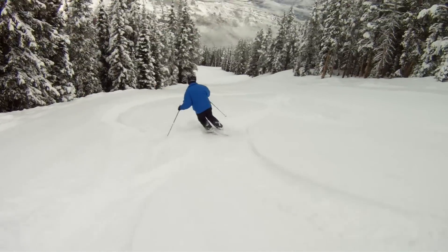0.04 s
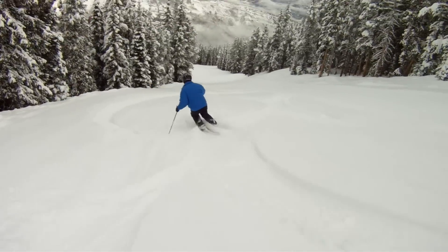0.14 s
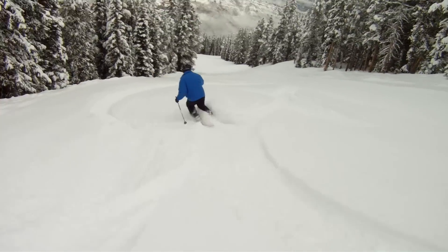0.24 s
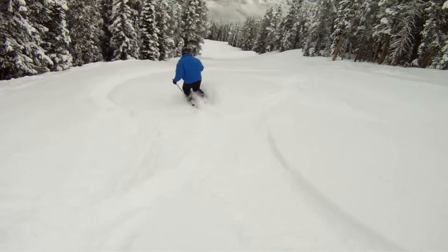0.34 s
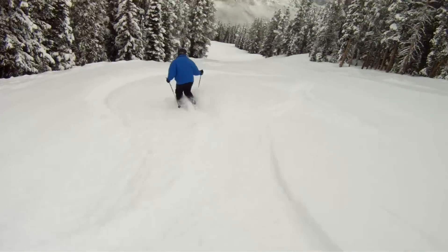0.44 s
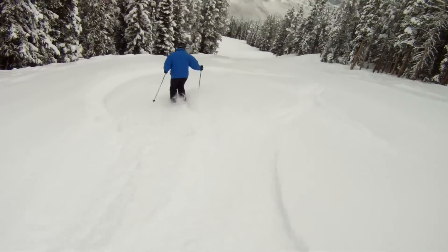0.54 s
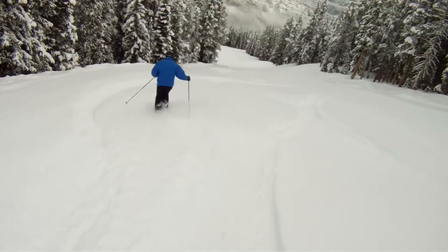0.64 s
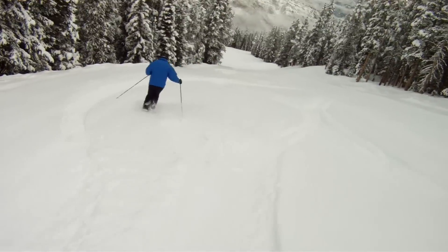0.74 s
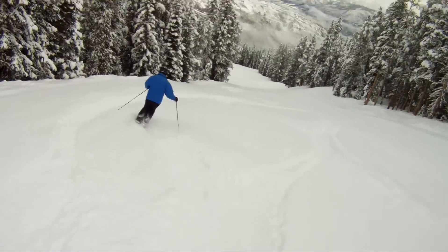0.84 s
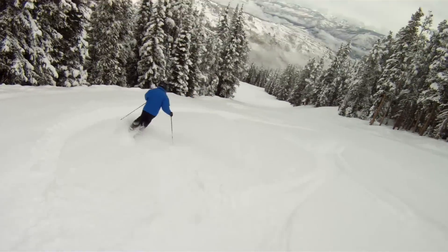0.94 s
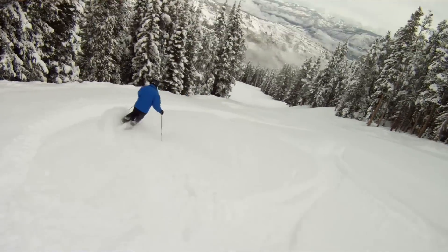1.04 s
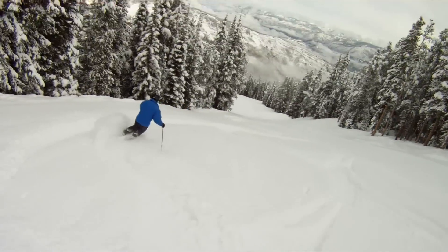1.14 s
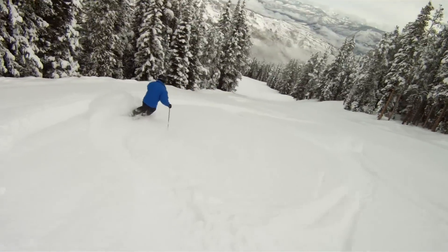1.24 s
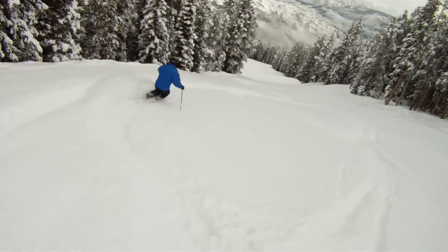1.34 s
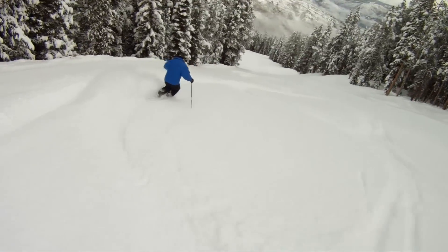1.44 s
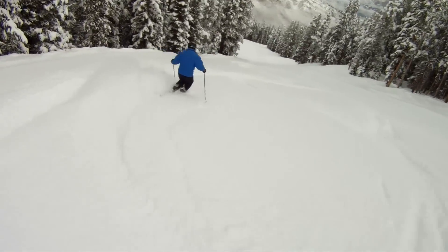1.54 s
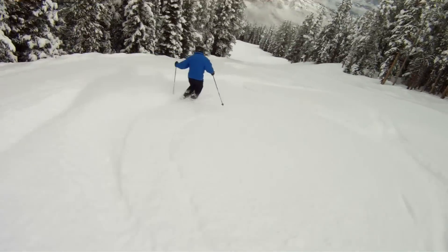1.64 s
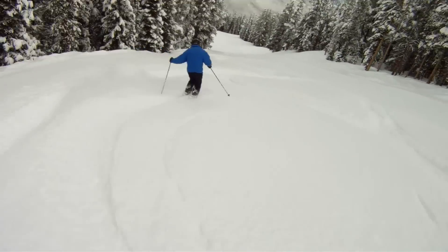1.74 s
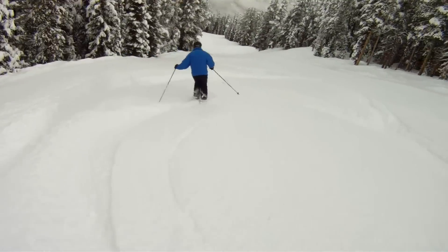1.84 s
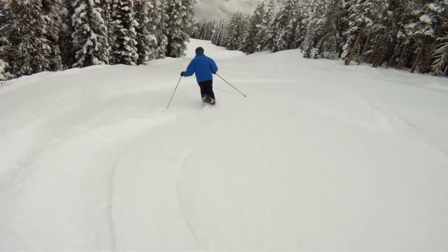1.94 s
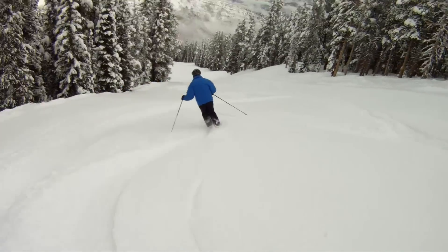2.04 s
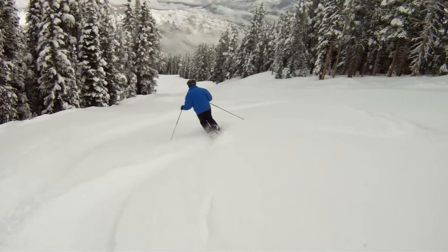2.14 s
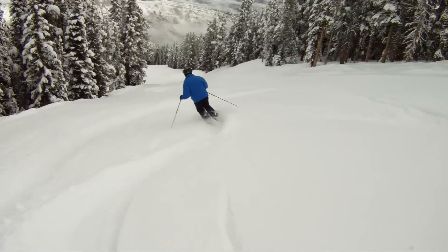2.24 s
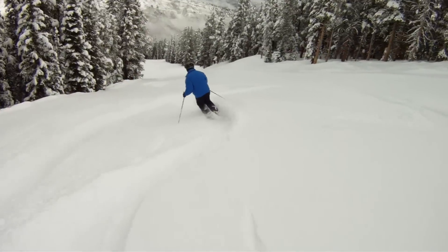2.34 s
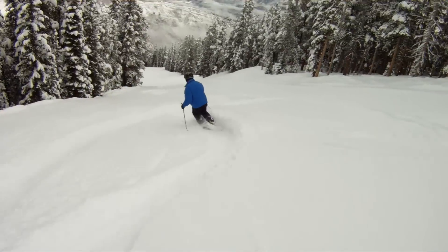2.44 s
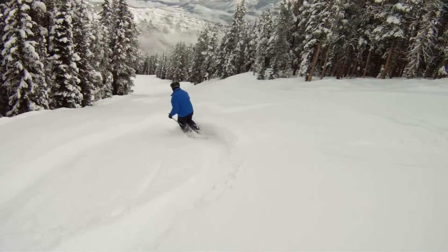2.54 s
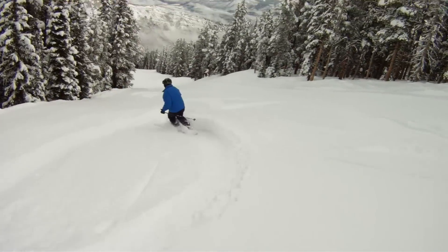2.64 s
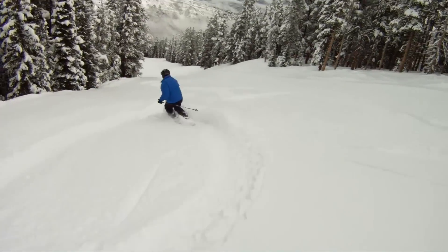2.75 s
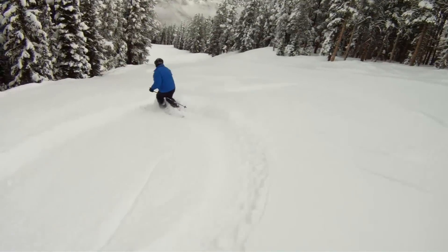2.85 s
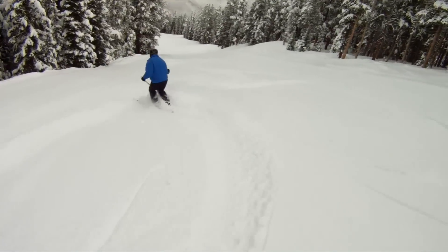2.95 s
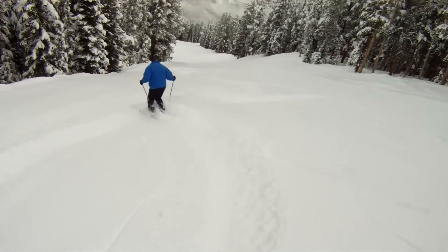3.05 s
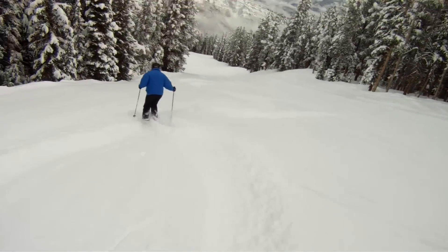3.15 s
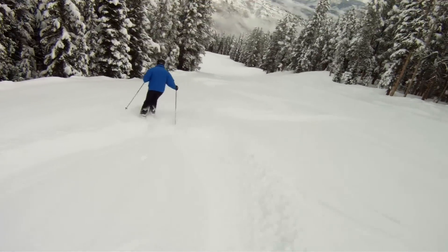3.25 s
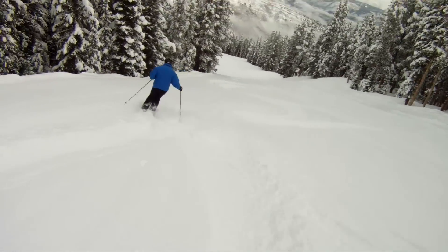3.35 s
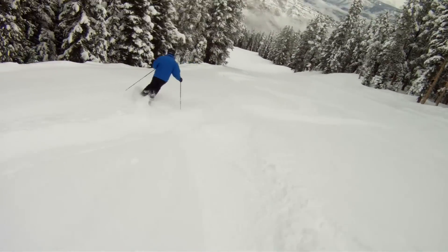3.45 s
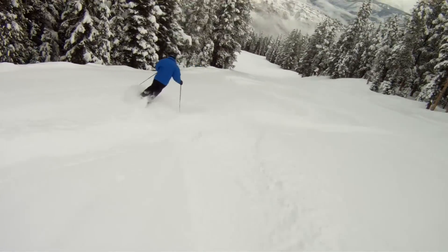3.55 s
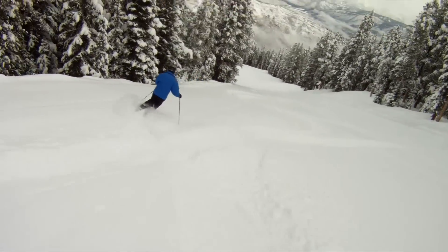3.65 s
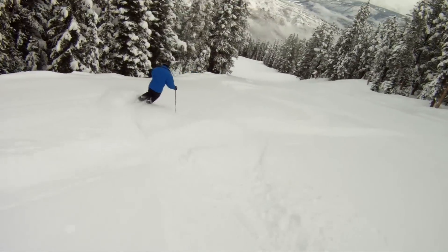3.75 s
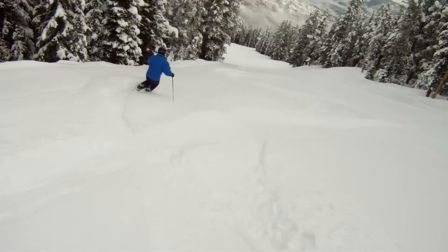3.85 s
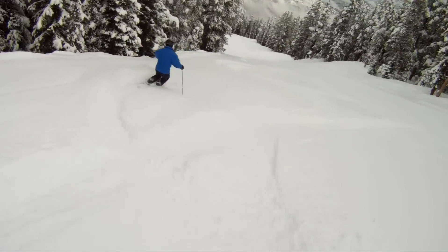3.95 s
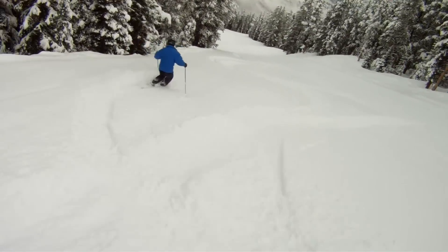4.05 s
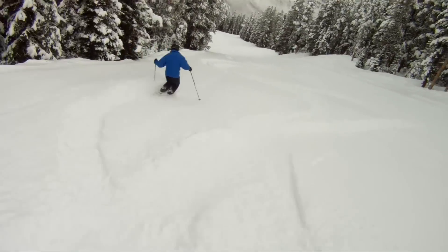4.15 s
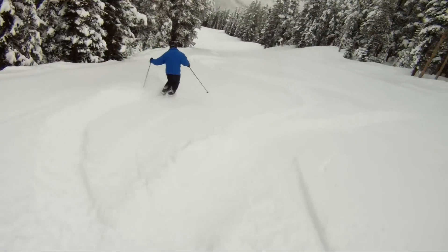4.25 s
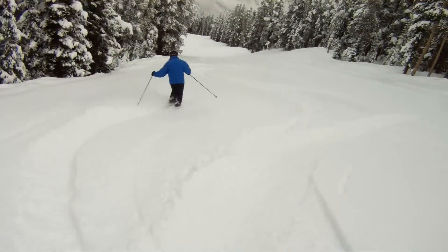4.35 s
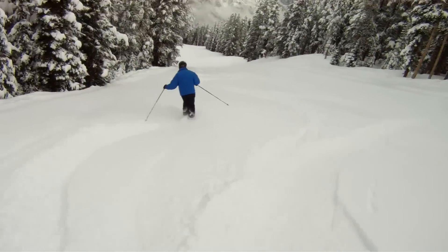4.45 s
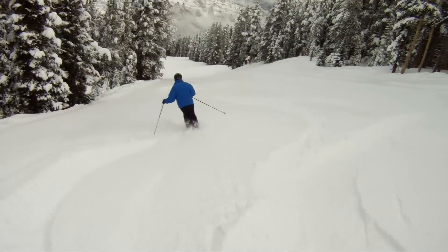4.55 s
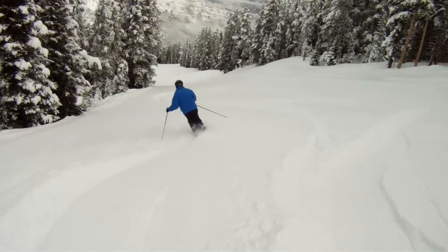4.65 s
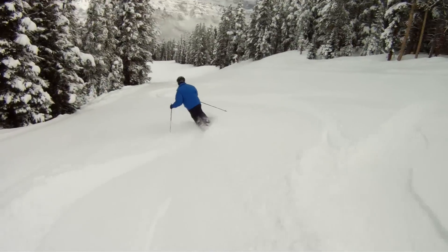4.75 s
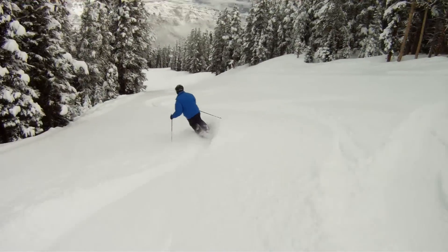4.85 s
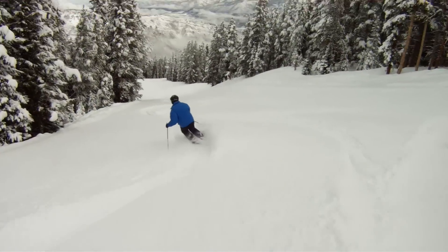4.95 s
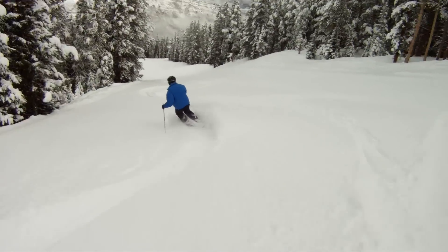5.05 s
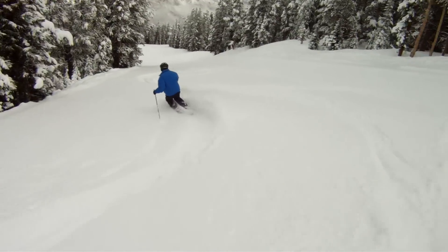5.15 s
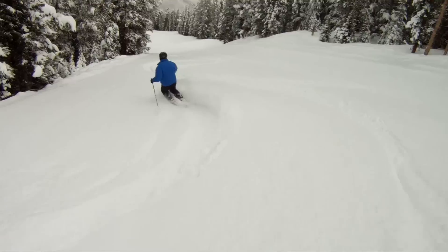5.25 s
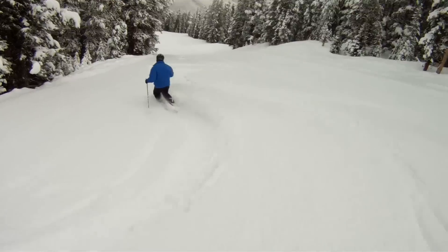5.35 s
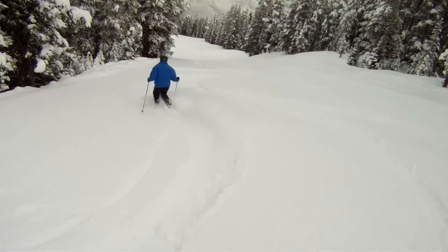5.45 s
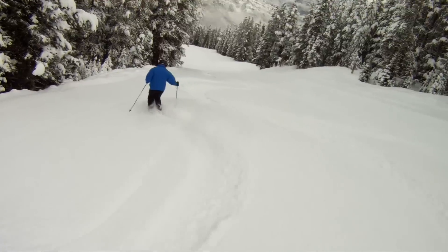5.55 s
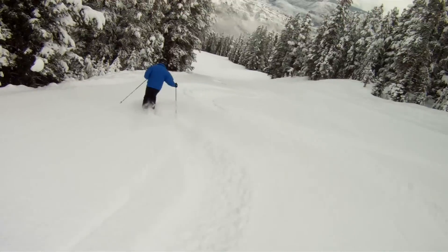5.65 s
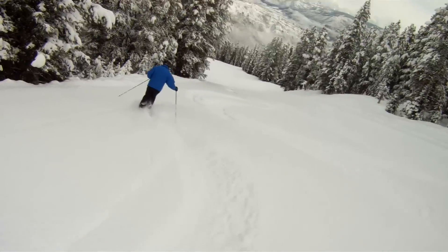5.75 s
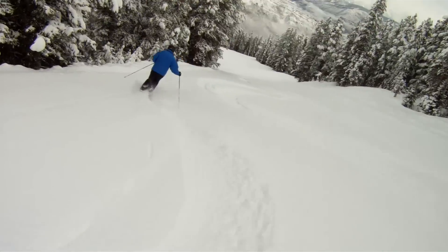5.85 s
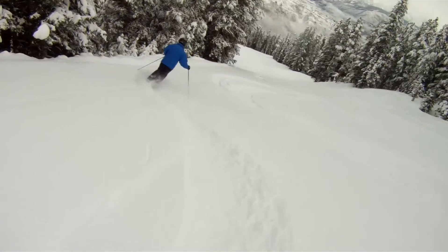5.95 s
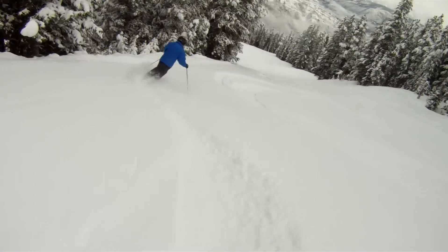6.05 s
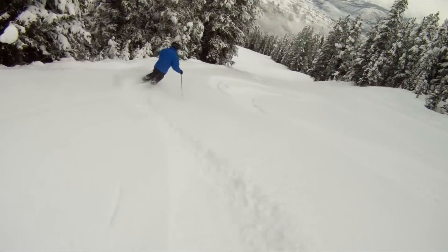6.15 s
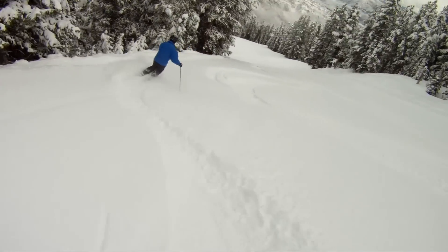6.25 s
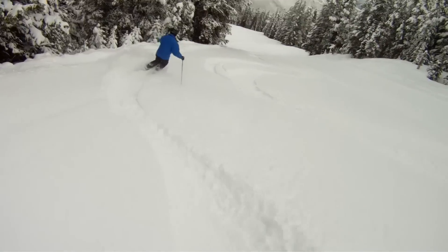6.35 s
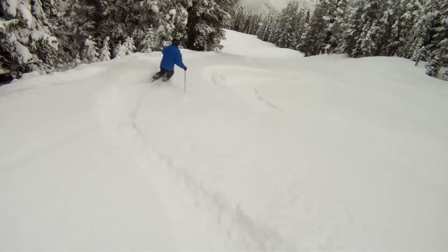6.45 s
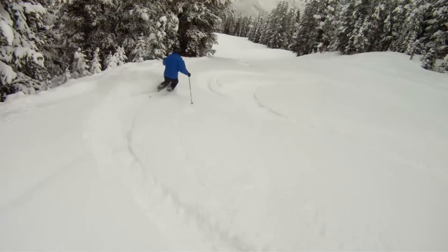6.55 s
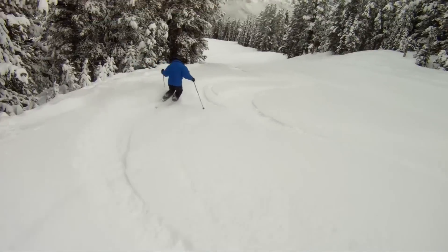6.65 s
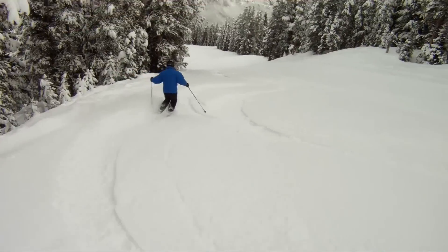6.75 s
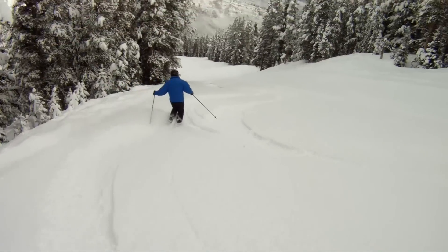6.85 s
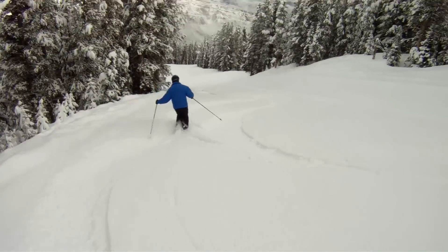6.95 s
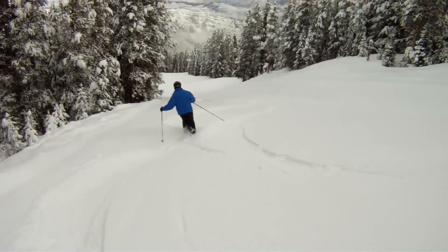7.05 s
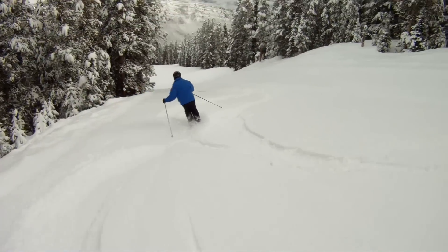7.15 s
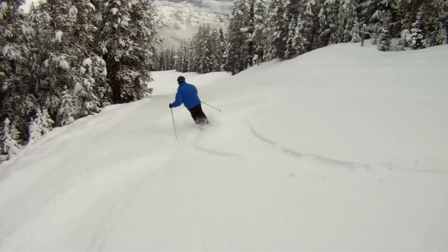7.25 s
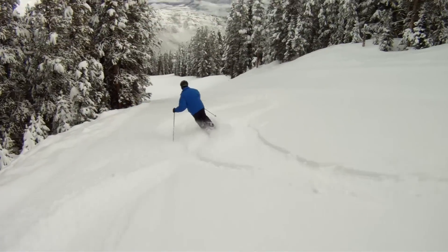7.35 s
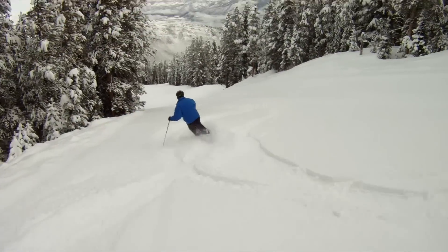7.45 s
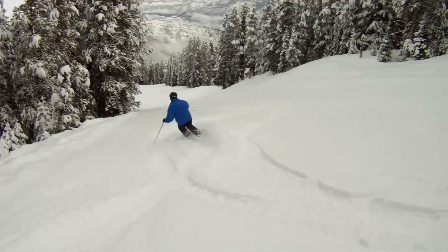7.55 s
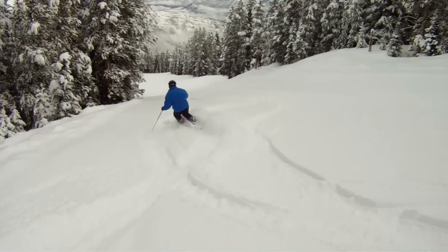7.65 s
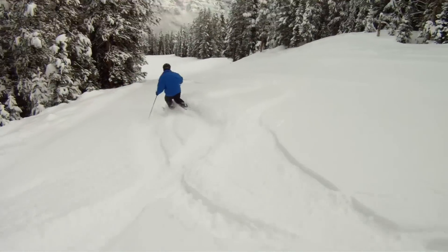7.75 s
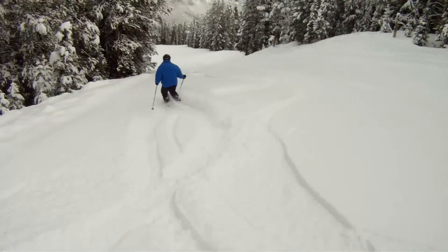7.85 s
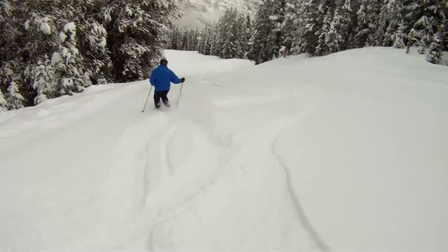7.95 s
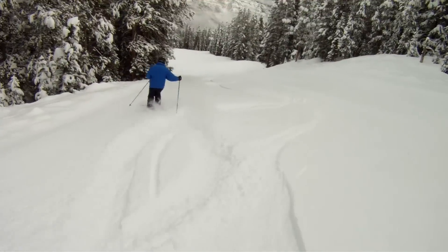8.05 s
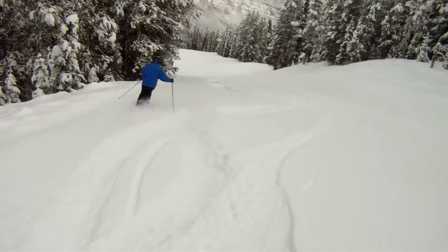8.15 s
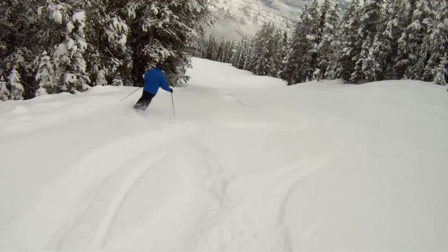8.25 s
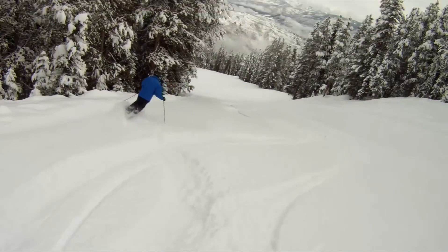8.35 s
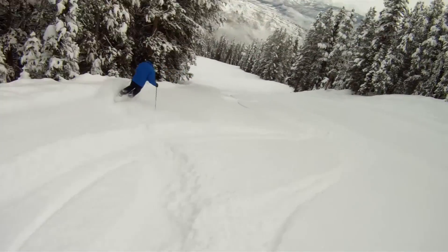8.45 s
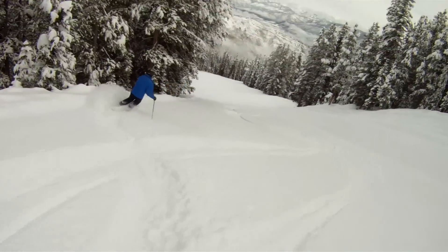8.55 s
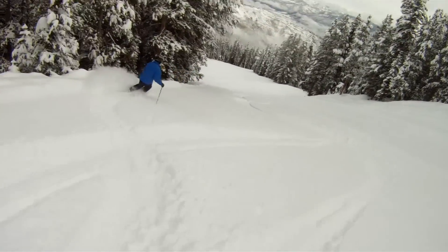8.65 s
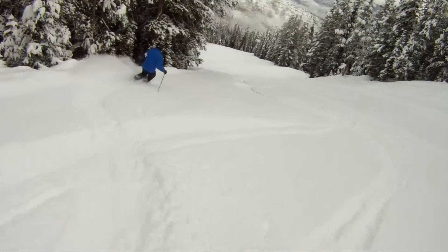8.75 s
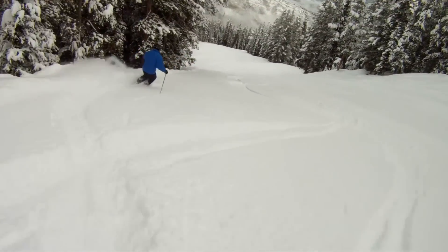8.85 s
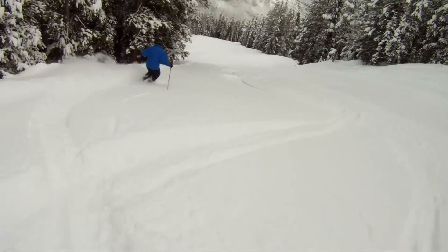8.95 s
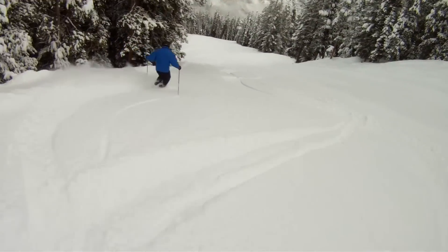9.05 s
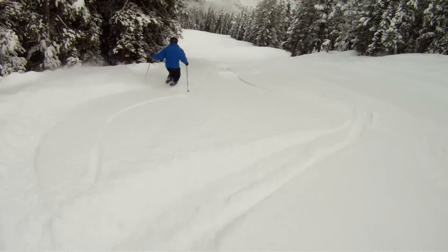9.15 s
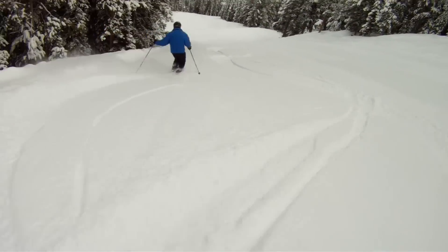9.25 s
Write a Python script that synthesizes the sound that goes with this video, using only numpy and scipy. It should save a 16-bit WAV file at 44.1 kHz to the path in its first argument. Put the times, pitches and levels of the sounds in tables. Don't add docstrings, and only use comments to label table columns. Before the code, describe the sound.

Low wind booms in lumps against a worn camera housing while skis swish through deep powder and a loose mount clacks sharply.

```python
import sys
import numpy as np
from scipy import signal
from scipy.fft import rfft, irfft, next_fast_len
from scipy.io import wavfile
from scipy.ndimage import uniform_filter1d, map_coordinates

SR = 44100
rng = np.random.default_rng(int(sys.argv[2]) if len(sys.argv) > 2 else 0)


def put_to_file(sound):
    columns = np.atleast_2d(sound).T
    safe = np.clip(columns, -1, 1)
    whole_steps = np.round(safe * 32767)
    wavfile.write(sys.argv[1], SR, whole_steps.astype(np.int16))


def natural_amplitude(level_db):
    exponent = np.asarray(level_db, float) / 20
    return 10 ** exponent


N = 409688

# start_s, hold_s, boom_db, buffet_db (against the boom)
GUSTS = [(0.01, 0.15, -42, -7), (0.222, 0.081, -35.5, -19), (0.39, 0.2, -51.5, 0),
         (0.932, 0.077, -39, -3.5), (1.123, 0.076, -41, -3.5), (1.293, .19, -41.5, -17),
         (1.655, 0.029, -55, -3.5), (1.84, 0.052, -54, -10), (2.017, 0.13, -44, -21),
         (2.254, 0.13, -47, -9), (2.487, 0.18, -38.5, -11), (2.662, 0.26, -46.5, -14),
         (2.908, 0.032, -53, -15), (3.386, 0.37, -58, 1), (3.82, 0.02, -46, -6), (3.963, 0.081, -45, -12),
         (4.16, 0.037, -73, -22), (4.444, 0.047, -48, -9), (4.642, 0.1, -50.5, -11),
         (4.796, 0.059, -45.5, -17), (4.923, 0.041, -41.5, -19), (5.03, 0.16, -47.5, -5.5),
         (5.286, .02, -69, -8), (5.73, 0.076, -45.5, -3), (5.857, 0.075, -42.5, -10),
         (5.99, 0.19, -41.5, -8), (6.313, 0.085, -44, -23), (6.576, 0.1, -62.5, 9.5),
         (6.918, 0.26, -49.5, -19), (7.157, 0.025, -42, 0), (7.415, 0.21, -44.5, -4.5),
         (7.699, 0.033, -35, -17), (7.902, .1, -62, -9), (8.214, 0.046, -51, -3.5),
         (8.365, 0.07, -41.5, -1.5), (8.512, 0.043, -40.5, -3), (8.792, 0.1, -41.5, -25),
         (9.01, 0.025, -48.5, -21), (9.252, .03, -52, -12)]
GUST_RISE_DB_PER_S, GUST_FALL_DB_PER_S = 254, 173
LULL_BOOM_DB, LULL_BUFFET_DB = -63.5, -63
# pitch_hz, width_hz, level_db
BOOM = [(48.65, 10.8, 4), (113, 22.2, -18.5)]
# pitch_hz, level_db (per Hz)
BUFFET = [(5, -30), (10, 1), (25, 6), (32, 1.5), (40, -7), (70, -10.5), (130, -51), (300, -120)]
# pitch_hz, level_db (per Hz)
RUSH = [(50, -51), (80, -9.5), (150, -8.5), (250, -12), (400, -15), (810, -21), (1230, -22), (1600, -23.5),
        (2100, -35.5), (3500, -120)]
# time_s, rush_db
AIR_SPEED = [(0.0, -62), (0.33, -63), (0.8, -68.5), (1.14, -62.5), (1.73, -66), (2.46, -60), (2.89, -66.5),
             (4.45, -67), (4.55, -63.5), (5.46, -65.5), (5.72, -58), (6.62, -66), (7.04, -60), (7.48, -59),
             (8.05, -67), (8.64, -60), (8.95, -65.5), (9.29, -62.5)]
# pitch_hz, width_hz, level_db
STRAP = [(229.8, 7.5, 0)]
# start_s, hold_s, level_db
HUMS = [(0.0, 0.28, -59), (0.723, 0.19, -65), (1.153, 0.12, -65.5), (1.56, 0.28, -71.5), (1.996, 0.24, -74),
        (2.603, 0.25, -75), (4.153, 0.23, -75.5), (4.774, 0.16, -63), (5.5, .2, -80), (6.298, .2, -71.5),
        (6.75, 0.18, -64), (7.0, 0.16, -67), (7.314, 0.21, -61.5), (8.798, 0.091, -62.5)]
HUM_FADE_DB_PER_S, HUM_REST_DB = 92.5, -77

# pitch_hz, width_hz, level_db
CAVITY = [(1234, 150, 12.5), (1050, 880, -7.5)]
SHELL = [(2029, 195, 6.5), (1617, 280, -2)]
DOOR = [(1030, 620, -3.5), (2280, 1500, -10)]
SIDE_WALL = [(2100, 130, -1.5), (2483, 210, 0.5), (2833, 480, -6), (3305, 250, -3), (4300, 1700, -12)]
LID = [(3350, 230, 8), (3850, 120, 9.5)]
VENT = [(5010, 950, 4), (5750, 290, -1)]
FLARE_DB = 1.5

# start_s, hold_s, load_db, spray_db, hollowness_db
RIGHT_EDGE = [
    (0.0, 0.19, -55.5, 2.5, 3.5),
    (.26, 0.15, -52, 2, -1.5),
    (2.3, 0.086, -53.5, -5, 3),
    (2.39, 0.071, -49.5, 3, 3.5),
    (2.49, 0.064, -45.5, -3, 2),
    (2.58, 0.092, -53, -1, 1),
    (2.72, 0.08, -50.5, 1.5, -4.5),
    (4.76, 0.56, -66, -2, 4),
    (5.03, 0.2, -67, -5, 8),
]
LEFT_EDGE = [(1.08, 0.31, -54, 0.84, 0), (1.26, 0.15, -53.5, -1.7, -9), (1.45, 0.052, -59.5, -0.65, -9),
             (3.705, 0.051, -61.5, 1.4, -3), (3.8, 0.073, -59.5, 1.7, -1), (3.93, 0.061, -62.5, 0, -0.5),
             (5.98, 0.097, -64, 1.1, -2.5), (6.2, 0.13, -61.5, 0.033, -0.5),
             (8.54, 0.025, -55, -0.64, -4.5), (8.6, 0.063, -54.5, -2.1, -6.5), (8.72, 0.18, -63.5, 0.46, 1)]
SKIDS = [(.85, 0.028, -69.5, -1, 13.5), (.92, 0.053, -70, 9, -5), (1.8, .4, -69.5, -1.5, 5.5),
         (4.5, 0.19, -69, 3.5, -3), (7.08, 0.29, -59, 0.5, -2.5), (7.38, 0.087, -59, 3.5, 5.5),
         (7.54, 0.077, -54, 1.5, 1), (7.68, 0.075, -62.5, 2.5, -9), (7.84, 0.053, -75.5, -1, -6),
         (8.28, 0.16, -65, 3.5, 2), (9.17, 0.058, -70, 0, 4)]
DEEP_SNOW = [
    (5.53, 0.2, -59.5, -8, 0),
    (5.8, 0.18, -62, 2, 0.0025),
    (6.8, 0.22, -61, -2, 0),
]
# (cavity_db, shell_db, door_db, side_wall_db, lid_db, vent_db)
STROKES = [
    (RIGHT_EDGE, 112, 240, (-8, 0.5, -10, -10, -12.5, -14)),
    (LEFT_EDGE, 214, 83, (0, -4, -7.5, 0, -11, -14.5)),
    (SKIDS, 157, 83, (-3, -2, -2, -8.5, -16, -21)),
    (DEEP_SNOW, 170, 320, (-6, -6, 3, -7.5, -15.5, -22)),
]
# cavity_db, shell_db, door_db, side_wall_db, lid_db, vent_db
GLIDE_DB = (-75.5, -76.5, -74.5, -77, -95.5, -82)

# start_s, peak_db, cavity_db, lid_db (last two against the peak)
CLACKS = [(.01, -22.5, -30, -22.5), (.505, -9.5, -33, -18), (.553, -33, -14, -23), (1.054, -10, -34, -19.5),
          (1.06, -18, -21, -24.5), (1.362, -25.5, -24, -22), (1.981, -18, -34, -22),
          (2.032, -37.5, -19, -37), (2.099, -17.5, -37, -19.5), (2.134, -26, -41, -26.5),
          (2.187, -27.5, -26, -25), (2.889, -42, -10, -37), (4.738, -22.5, -28, -23.5),
          (7.238, -16.5, -31, -19), (7.595, -40.5, -13, -6.5), (8.452, -6, -33, -18.5),
          (8.466, -15, -27, -20.5), (8.488, -21.5, -18, -23), (9.25, -32, -14.5, -26)]
BUMPS = [(.465, -36, -16, -23), (.541, -32.5, -14, -36), (2.88, -30, -27, -27), (4.431, -23.5, -34, -25),
         (4.617, -28, -25, -27), (5.967, -28, -17, -27), (5.972, -31.5, -29, -24), (6.9, -26, -25, -25),
         (7.1, -28, -28, -26), (8.46, -28, -33, -30), (8.483, -18.5, -30, -46), (9.229, -21, -41, -24)]
TICKS = [(.981, -10, -52, -34), (.9855, -31.5, -5, -22), (4.508, -27, -22, -25.5), (4.678, -27.5, -18, -27),
         (5.777, -28.5, -6.5, -20), (5.7826, -17.5, -39, -46), (8.389, -12.5, -22.5, -34),
         (8.474, -18, -14, -25), (3.409, -26.5, -13, -46), (5.029, -36.5, -24.5, -23),
         (5.089, -38, -15, -17), (5.264, -38, -18, -20), (5.529, -36.5, -12, -19), (2.244, -47, -18, -28),
         (6.042, -34, -27, -11), (7.455, -40.5, -10, -4)]
POPS = [(.607, -43.5, 2, -24), (1.643, -40, -4, -36), (3.031, -55.5, 6, -36.5), (3.652, -52, -3, -30),
        (4.569, -61, 11, -29), (6.578, -52, -1, 2), (7.363, -58, 6, -18), (8.508, -49, 4, -25.5),
        (9.179, -41.5, -5, -31), (1.614, -46, -9, -37), (4.088, -57, -3, -16), (4.15, -51.5, -7, -6.5),
        (9.137, -49, -9.5, -32)]
# rows, thud_db, boom_db, contact_s
CONTACTS = [
    (CLACKS, -15, -13.5, 0.00083),
    (BUMPS, -13.5, -13, 0.0012),
    (TICKS, -32, -38, 0.0017),
    (POPS, -27, -18, 0.0014),
]
# pitch_hz, level_db, t60_s
KNOCK_SHELL = [(2020, 15.5, 0.004), (2670, -21.5, 0.015)]
KNOCK_SOFT = [(1590, 13, 0.0051), (1300, -0.5, 0.0045)]
KNOCK_CAVITY = [(1187, 8.5, 0.0095), (1000, -2.5, 0.0058)]
KNOCK_LID = [(3210, 1, 0.012), (3536, 4.5, 0.0098), (5044, -9, 0.014)]
KNOCK_THUD = [(381, 2, 0.03), (193, 8, 0.03), (310, 3.5, 0.023), (112, -13.5, 0.35), (797, 2, 0.024)]
KNOCK_BOOM = [(51.6, 7.5, 0.17)]

# start_s, peak_db, t60_s, dullness_db
SCUFFS = [(0.626, -32, 0.046, -3), (0.643, -38, 0.02, 6), (0.841, -51, 0.043, 12), (0.9, -22, 0.024, -2.5),
          (.91, -38, 0.061, 3.5), (0.937, -30, 0.03, 2), (0.9662, -46, 0.06, -2), (1.003, -25.5, 0.029, -2),
          (1.0164, -51, 0.049, -3), (1.912, -48.5, 0.042, 16), (1.998, -20, 0.029, -3),
          (2.8394, -37, 0.023, 3), (4.41, -55, 0.072, 15), (4.423, -52, 0.032, 17),
          (4.4523, -21, 0.014, -4), (4.457, -33.5, 0.033, 3), (4.921, -55.5, 0.12, 16),
          (4.933, -43, 0.02, 13), (4.9752, -21, 0.016, -1), (5.19, -42.5, 0.05, 10), (5.263, -54, .03, 2),
          (.516, -44, 0.013, -10), (5.8, -40, 0.047, 6), (6.5004, -48, 0.046, 6), (6.91, -42, 0.096, 12),
          (7.71, -33.5, 0.037, 1), (8.293, -33.5, 0.015, 3.5), (8.299, -40, 0.035, 0),
          (8.3708, -28, 0.032, -1), (8.4043, -8, 0.0065, -3), (8.411, -29, 0.022, 4),
          (8.515, -31, 0.019, -9)]

# pitch_hz, level_db (per Hz)
HISS = [(9, -34), (15, -2.5), (54, -9.5), (440, -18.5), (1270, -40.5), (1940, -23.5), (3500, -21.5),
        (4940, -27.5), (5600, -40.5), (7000, -44)]

# pitch_hz, level_db
ANTI_ALIAS = [(5400, 0), (5750, -3), (6000, -4), (6200, -9), (6600, -40), (7000, -120)]
CLOCK_HZ, TOP_HZ = 12000, 15330
# pitch_hz, level_db
TOP = [(15330, -17.5), (16000, -3.5), (16500, -10), (16700, -65.5)]
# pitch_hz, level_db (per Hz)
CIRCUIT = [(9000, -120), (10500, -1), (12000, -0.5), (15100, 1), (15400, -120)]
CIRCUIT_DB = -81.5
# pitch_hz, level_db (per bin)
DROPOUT = [(10000, -125), (11300, -103), (13000, -101), (14500, -103.5), (14900, -103), (15300, -99)]
DROPOUT_SWING_DB, DROPOUT_DEPTH_DB = 2.5, -17


def wind():
    start, hold, boom_db, buffet_db = np.transpose(GUSTS)

    def gusts(db, lull_db):
        return swells(start, hold, db, GUST_RISE_DB_PER_S, GUST_FALL_DB_PER_S, lull_db)

    boom = steadied(patchy(steep(BOOM, 1.82), patchy_db=2.2), share=0.8, size=1800)
    boom = natural_amplitude(4.0) * gusts(boom_db, LULL_BOOM_DB) * boom

    buffet = steadied(patchy(spectrum(BUFFET), patchy_db=7.0), share=0.83, size=4000)
    buffet = natural_amplitude(5.0) * gusts(boom_db + buffet_db, LULL_BUFFET_DB) * buffet

    rush_db, = curves(AIR_SPEED)
    rush = unit(natural_amplitude(0.8 * wobble(40)) * patchy(spectrum(RUSH), patchy_db=0.6))
    rush = natural_amplitude(rush_db + 4.5) * rush

    flutter = natural_amplitude(1.5 * wobble(9))
    hum = flutter * steadied(patchy(steep(STRAP, 2), patchy_db=1), share=0.7, size=4000)
    hum = hum * swells(*np.transpose(HUMS), HUM_FADE_DB_PER_S, HUM_FADE_DB_PER_S, HUM_REST_DB)
    return boom + buffet + rush + hum


def skis():
    crunch = natural_amplitude(0.8 * wobble(40) + 1.7 * wobble(300))
    out = np.zeros(N)
    for part, modes in enumerate([CAVITY, SHELL, DOOR, SIDE_WALL, LID, VENT]):
        flare = natural_amplitude(FLARE_DB * wobble(12))
        swish = patchy(steep(modes, 1.58), patchy_db=0.0)
        out += load(part) * unit(flare * crunch * swish)
    return out


def load(part):
    upper = part > 2
    airy = part % 5 == 0
    phases = []
    for rows, rise, fall, colour_db in STROKES:
        for start, hold, db, spray_db, hollow_db in rows:
            level_db = db + colour_db[part] + spray_db * upper + hollow_db * airy
            phases.append((start, hold, level_db, rise, fall))
    return swells(*np.transpose(phases), GLIDE_DB[part])


def mount():
    out, t = np.zeros(N + SR), np.arange(SR // 3) / SR
    knocks = [(*row, *weight) for rows, *weight in CONTACTS for row in rows]
    chance = rng.standard_normal((len(knocks), 22))
    scatter_db = 0.4
    detune = 1 + 0.004 * np.clip(chance, -1.5, 1.5)
    rebound = round(0.001775 * SR)
    for knock, luck, tune in zip(knocks, chance, detune):
        start, db, cavity_db, lid_db, thud_db, boom_db, contact_s = knock

        def ring(modes, first):
            total = np.zeros(len(t))
            for i, (hz, level_db, t60) in enumerate(modes, first):
                decay = natural_amplitude(level_db + scatter_db * luck[i] - 60 * t / t60)
                total += decay * np.sin(2 * np.pi * hz * tune[i + 4] * t)
            return total

        soft_db = np.clip(-12 - 0.9 * (lid_db + 22), -14, -3)
        hard = -ring(KNOCK_SHELL, 0) + natural_amplitude(soft_db) * ring(KNOCK_SOFT, 2)
        hard += natural_amplitude(cavity_db + 11.0) * ring(KNOCK_CAVITY, 4)
        hard += natural_amplitude(lid_db + 3.5) * ring(KNOCK_LID, 6)
        hard += natural_amplitude(thud_db - 5.0) * ring(KNOCK_THUD, 9)
        hard *= 1 - np.exp(-(t / contact_s) ** 2)
        hard = hard - natural_amplitude(-10.5 + scatter_db * luck[20]) * np.pad(hard, (rebound, 0))[:len(t)]
        slow_rise = 1 - np.exp(-t / 0.019)
        boom = -natural_amplitude(boom_db) * ring(KNOCK_BOOM, 14) * slow_rise
        out[round((start + 0.0005) * SR):][:len(t)] += natural_amplitude(db + 2.0) * (hard + boom)
    return out[:N]


def cloth():
    t = np.arange(N) / SR
    bright, dull = np.zeros(N), np.zeros(N)
    for start, db, t60, dull_db in SCUFFS:
        onset = np.clip((t - start) / 0.0015, 0, 1)
        rub = natural_amplitude(db - 16.5 - 60 * np.clip(t - start, 0, 1) / max(t60, 0.005)) * onset
        bright += rub
        dull += natural_amplitude(dull_db) * rub
    grit = natural_amplitude(1.7 * np.clip(wobble(350), -3, 1.5))
    fizz = patchy(steep([(4850, 1100, 6), (3550, 500, 3)], 2), patchy_db=-5.5)
    body = patchy(resonances([(2200, 740, 0)]), patchy_db=1)
    return grit * (bright * fizz + dull * body)


def floor():
    return natural_amplitude(-68) * patchy(spectrum(HISS), patchy_db=0.7)


def swells(start, hold, db, rise, fall, rest_db):
    t = np.arange(0, N + 64, 64)[:, None] / SR
    before, after = np.clip(start - t, 0, None), np.clip(t - start - hold, 0, None)
    level_db = db - rise * before - fall * after
    power = np.sum(natural_amplitude(level_db) ** 2, axis=1) + natural_amplitude(rest_db) ** 2
    return np.interp(np.arange(N) / SR, t[:, 0], np.sqrt(power))


def patchy(response, patchy_db):
    z = signal.stft(rng.standard_normal(N), nperseg=512)[2]
    field = uniform_filter1d(rng.standard_normal(z.shape), size=5, axis=0)
    field = uniform_filter1d(field, size=10, axis=1)
    noise = signal.istft(z * natural_amplitude(patchy_db * unit(field)), nperseg=512)[1][:N]
    return unit(filtered(noise, response))


def steadied(x, share, size):
    power = np.abs(uniform_filter1d(x ** 2, size=size)) + 0.02
    return unit(x / power ** (share / 2))


def wobble(rate):
    return map_coordinates(rng.standard_normal(N // 100), [np.arange(N) * rate / SR])


def resonances(modes):
    def response(f):
        return sum((-1) ** k * natural_amplitude(db) * 1j * f * width / (hz * hz - f * f + 1j * f * width)
                   for k, (hz, width, db) in enumerate(modes))
    return response


def steep(modes, power):
    return lambda f: resonances(modes)(f) ** power


def spectrum(points):
    return lambda f: natural_amplitude(along(points, f))


def along(points, hz):
    f, v = np.transpose(points)
    return np.interp(np.log(hz + 1), np.log(f + 1), v)


def curves(rows):
    s, *cols = np.transpose(rows)
    return [np.interp(np.arange(N) / SR, s, c) for c in cols]


def filtered(x, response):
    m = next_fast_len(N + SR // 4)
    return irfft(rfft(x, m) * response(np.fft.rfftfreq(m, 1 / SR)), m)[:N]


def unit(x):
    return x / np.sqrt(np.mean(x ** 2) + 1e-20)


def scene():
    return (wind() + skis() + mount() + cloth() + floor())[None]


def without_faint_highs(x):
    hz, _, z = signal.stft(x, SR, nperseg=1024)

    def smooth(v):
        return uniform_filter1d(uniform_filter1d(v, size=3, axis=0), size=7, axis=1)

    swing = unit(smooth(rng.standard_normal(z.shape)))
    need = natural_amplitude(along(DROPOUT, hz)[:, None] + DROPOUT_SWING_DB * swing) ** 2
    power = np.abs(smooth(np.abs(z) ** 2)) + 1e-20
    kept = 1 / (1 + np.minimum(need / power, 100) ** 8)
    return signal.istft(z * np.maximum(kept, natural_amplitude(DROPOUT_DEPTH_DB)), SR, nperseg=1024)[1][:N]


def sharp_only(top):
    def power(size):
        return np.abs(uniform_filter1d(top ** 2, size=size)) + 1e-14

    jump = power(300) / power(5000)
    return top * jump ** 6 / (jump ** 6 + 4.2 ** 6)


def low_pass(x):
    return signal.sosfilt(signal.butter(12, 16530, fs=SR, output="sos"), x)


def record(dry):
    eased = dry[0] / (1 + np.abs(dry[0] / 0.75) ** 4) ** (1 / 4)
    slow = filtered(eased, lambda f: spectrum(ANTI_ALIAS)(f) / np.sinc(np.minimum(f / CLOCK_HZ, 0.5)))
    mirrored = slow * (1 + 2 * np.cos(2 * np.pi * CLOCK_HZ * np.arange(N) / SR))
    held = filtered(mirrored, lambda f: np.sinc(f / CLOCK_HZ) * (f < TOP_HZ))
    top = filtered(mirrored, lambda f: np.sinc(f / CLOCK_HZ) * (f >= TOP_HZ) * spectrum(TOP)(f))
    circuit = natural_amplitude(CIRCUIT_DB) * patchy(spectrum(CIRCUIT), patchy_db=3)
    mix = without_faint_highs(held + circuit) + sharp_only(top)
    return low_pass(mix[None])


dry = scene()
out = record(dry)
put_to_file(out)
```